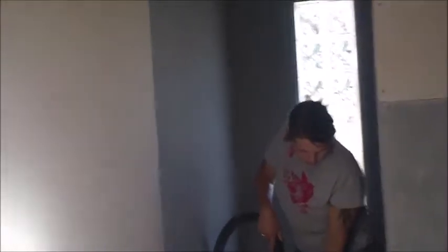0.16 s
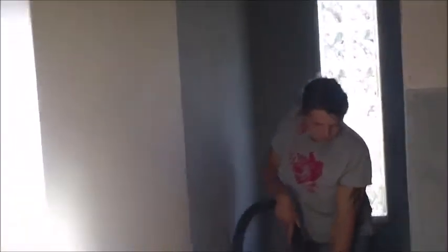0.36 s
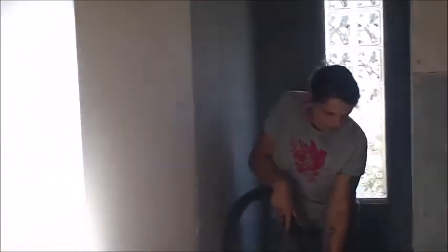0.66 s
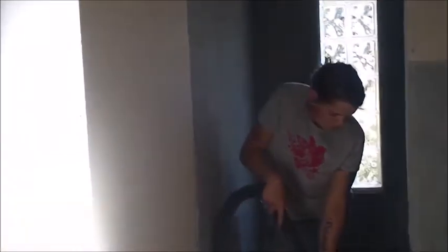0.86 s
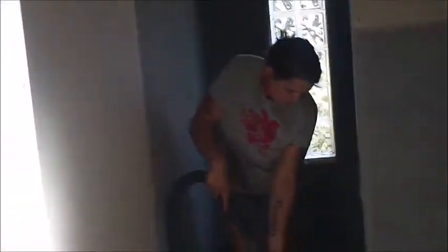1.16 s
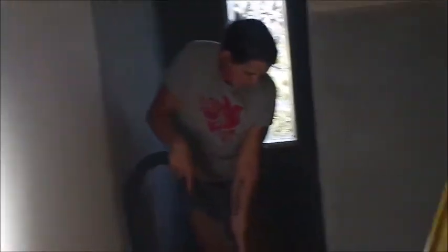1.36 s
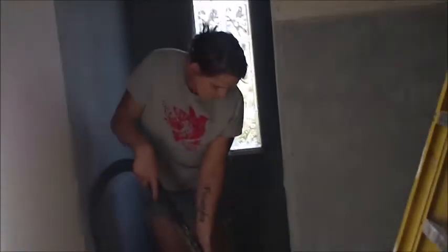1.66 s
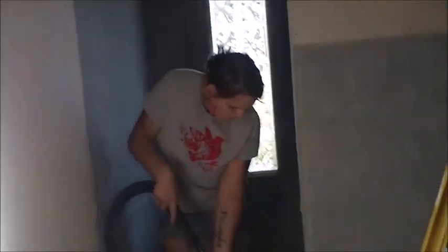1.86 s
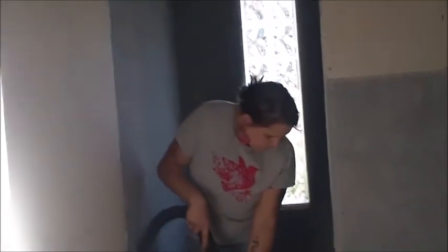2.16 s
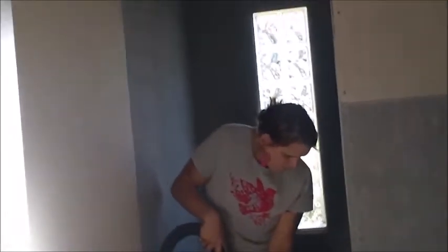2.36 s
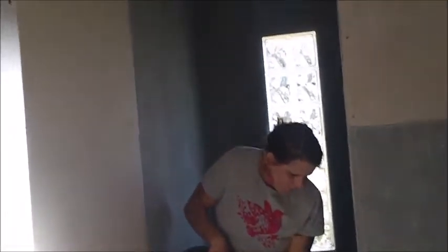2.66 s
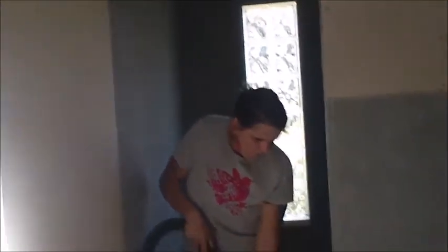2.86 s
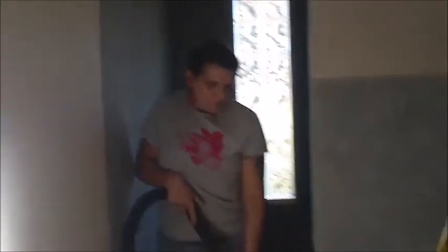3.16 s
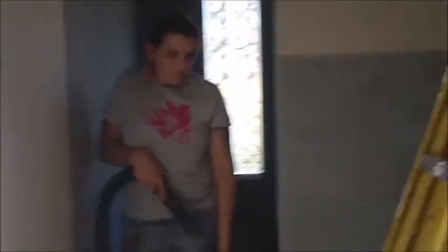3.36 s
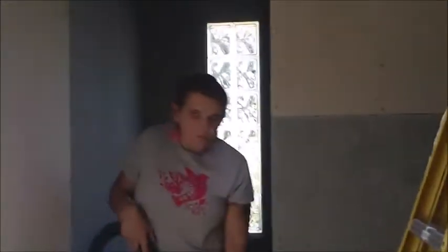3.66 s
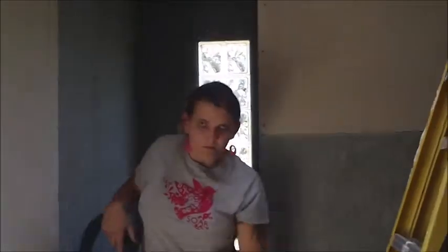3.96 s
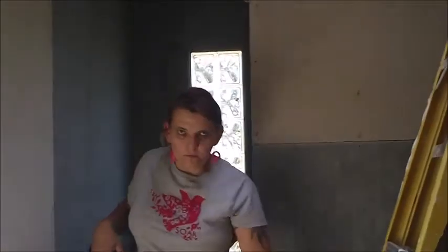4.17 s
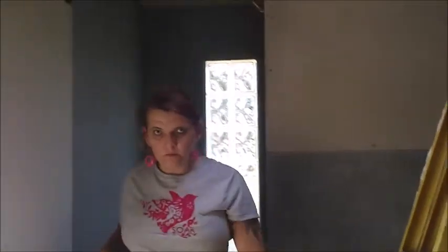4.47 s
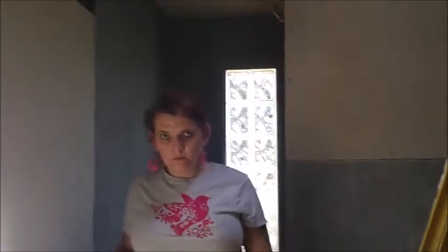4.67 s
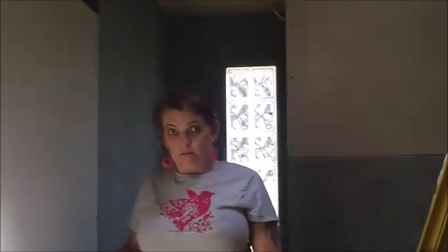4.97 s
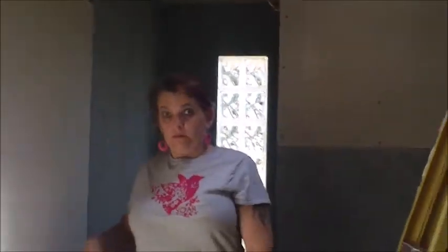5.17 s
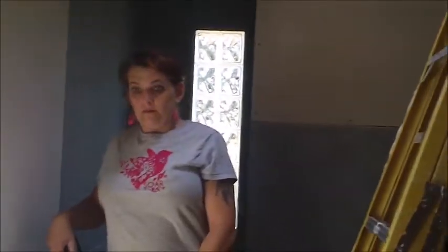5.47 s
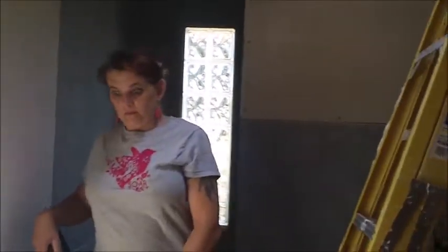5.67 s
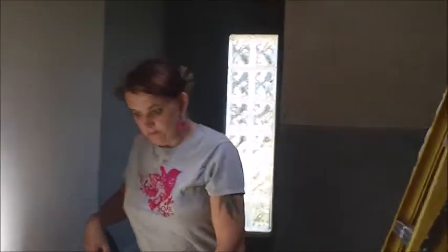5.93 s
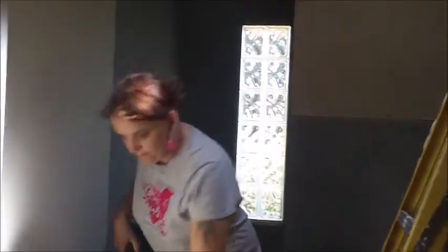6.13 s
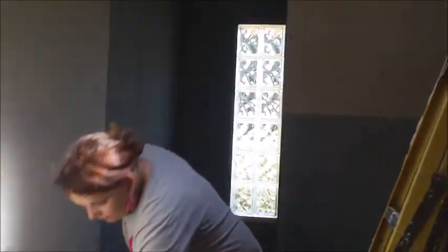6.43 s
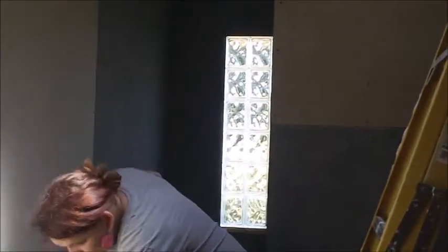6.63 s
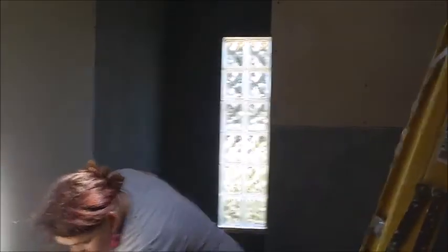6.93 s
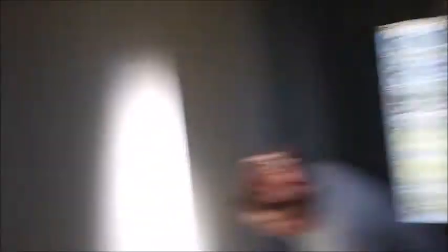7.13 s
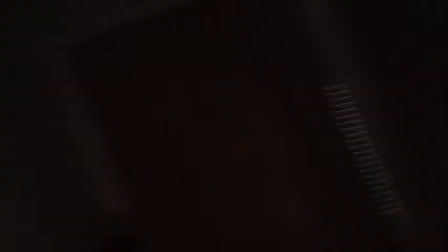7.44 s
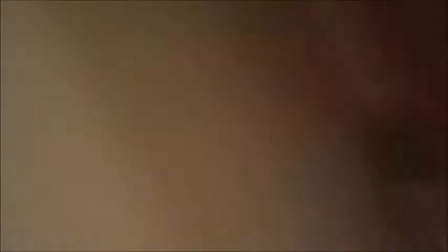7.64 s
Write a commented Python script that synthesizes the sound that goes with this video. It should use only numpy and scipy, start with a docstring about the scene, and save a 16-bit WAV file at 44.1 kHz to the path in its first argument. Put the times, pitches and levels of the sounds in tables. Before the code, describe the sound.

A vacuum cleaner runs close to a hand-held microphone in a bare room, its steady whine swelling and fading over rushing air and nozzle hiss. Midway comes a sharp tap, and the suction eases slightly. Near the end the cleaner is switched off and the motor starts winding down in a falling tone, with a brief soft rub and a second tap near the microphone.

```python
"""A vacuum cleaner's strong fan tone over rushing air, close to a hand-held microphone in a bare room.
Weak overtones flutter above it; air drones in the canister, rushes in the hose and hisses at the nozzle.
The suction eases as the nozzle comes to rest, and two taps and a rub sound close by. Switched off, the
motor coasts down, its falling tone swelling and fading through the plastered room's standing waves.
A limiter lifts the air noise whenever the tone is weak."""
import sys
import numpy as np
from scipy import signal
from scipy.fft import rfft, irfft, next_fast_len
from scipy.io import wavfile
from scipy.ndimage import uniform_filter1d, map_coordinates

SR = 44100
rng = np.random.default_rng(int(sys.argv[2]) if len(sys.argv) > 2 else 0)


def int16_out(signal):
    """Quantize to a 16-bit WAV file."""
    q = np.round(np.clip(np.atleast_2d(signal).T, -1, 1) * 32767)
    wavfile.write(sys.argv[1], SR, q.astype(np.int16))


N = 343980
T = np.arange(N) / SR

# hard taps near the microphone: start_s, level_db, pitch_hz, swell_s, echo_relative_db
TAPS = [(3.862, 3, 1700, .00022, -21), (7.6545, -1.5, 1230, .0006, -17)]
# spectra of the low rumble, hose rush, floor suction, nozzle hiss and fan rasp: frequency_hz, relative_db
RUMBLE_SPECTRUM = [(20, -17), (40, -20), (70, -5), (110, 3.5), (200, 2.5), (500, -24)]
HOSE_SPECTRUM = [(350, -31.5), (520, -3.5), (620, -5), (725, -2), (790, 0.5), (880, -2.5), (1010, -1),
                 (1130, -4), (1270, -2.5), (1400, -0.5), (1480, -4.5), (1570, -9.5), (1900, -36),
                 (3000, -65)]
SUCTION_SPECTRUM = [(900, -47), (1550, -7.5), (1750, -3.5), (1920, -3), (2200, -2.5), (2500, -5),
                    (2900, -7.5), (3400, -7.5), (4300, -15), (7000, -44)]
NOZZLE_SPECTRUM = [(2000, -36), (3300, -14), (4100, -3.5), (5200, -0.5), (6200, -2), (7100, 0), (9200, -3),
                   (10300, -5.5), (11600, -9), (13500, -12.5), (15200, -14)]
RASP_SPECTRUM = [(1200, -18), (1700, 7), (2200, -5), (2650, -9), (3300, -22)]
# whistles at the nozzle's lip: centre_s, half_length_s, pitch_hz, level_db
WHISTLES = [(2.2, 1.0, 5080, -34), (4.0, 0.38, 5950, -33), (4.8, 0.43, 6500, -31), (5.5, .3, 5750, -31),
            (6.35, .2, 5550, -32), (6.7, .3, 5870, -32), (7.7, .2, 5380, -39)]
# resonances of the canister, and of the hose and wand: pitch_hz, width_hz, relative_db
CANISTER_MODES = [(117, 18, -17), (170, 16, -7.5), (202, 24, -7), (240.3, 19.5, 2.5), (278.4, 13.2, 4.5),
                  (316, 8.8, -5), (356, 20, -1.5), (406, 26, -4), (469, 19, -2)]
PIPE_MODES = [(735, 31, -4.5), (773, 9.8, -1), (867, 26, -2.5), (952, 78, -11), (1403, 35, -2),
              (1668, 31, -2), (2020, 50, -27), (2740, 50, -3), (4596, 43, -3), (5670, 180, -14),
              (6070, 100, -2)]
# canister drone, shaft tone, its octave and blade tone at the moving microphone: time_s, relative_db
DRONE_CURVE = [(0, -2), (1.3, 0), (2.7, -0.5), (3.4, -1), (4.25, 3), (4.8, 1.5), (6.5, 0), (7.8, -2)]
SHAFT_CURVE = [(0, -5.5), (.3, -14), (.42, -26), (.6, -22), (.68, -32), (.78, -21), (.87, -10), (1.14, -4),
               (1.8, -4.5), (2.76, -11), (3.3, -10.5), (3.66, -5), (4.26, -10), (4.62, -4), (5.46, -1.8),
               (6.0, 1), (6.88, 1)]
OCTAVE_CURVE = [(0, -35), (1.7, -33.5), (2.15, -35), (3.5, -36), (4.2, -27.5), (4.5, -23.5), (4.75, -30.5),
                (5.6, -37), (6.88, -37)]
BLADE_CURVE = [(0, -43), (.48, -46), (.63, -33.5), (.8, -46), (1.17, -35.5), (1.5, -33), (1.95, -33),
               (2.28, -44.5), (2.7, -37), (3.1, -47), (4.38, -40.5), (5.3, -48), (5.52, -36), (5.82, -43),
               (6.06, -37), (6.36, -48), (6.88, -40)]
# weak fan overtones, one row for each of OVERTONE_ORDERS: full_suction_db, eased_change_db
OVERTONE_LEVELS = [(-29.5, -4), (-37.5, 1.5), (-36, -1), (-44, 0), (-48, 0)]
# the room's standing waves, crossed by the falling tone: pitch_hz, level_db
ROOM_MODES = [(473.9, 0), (458, -6.5), (439.0, -8), (423.7, -6), (412.5, -1.7), (399.6, -7), (379.3, -8),
              (367.3, -11.5), (355.5, -0.8), (344.4, -4.5), (331, -7.5), (318.4, -11), (313.5, -14),
              (300, -15.5), (288, -14.5), (276.9, -20), (269.5, -14.7), (261.3, -12), (254, -14.5),
              (246.7, -8.9)]
# resonances in which the falling overtones flare: pitch_hz, half_width_hz, level_db
FLARES = [(1160, 130, -27), (2120, 260, -30), (2640, 160, -31), (3250, 300, -38)]
# brief dips in the treble: centre_s, depth_db
TREBLE_DIPS = [(1.168, 16), (2.105, 16), (3.385, 10), (4.367, 14), (4.409, 14), (4.473, 10), (5.775, 15)]
# the recorder's treble notches: centre_hz, width_hz
NOTCHES = [(7890, 1520), (10980, 570)]

RUN_HZ, BLADES, OVERTONE_ORDERS = 496.8, 7, (3, 4, 5, 6, 14)
OFF_S, DRAG_S, FRICTION_HZ_PER_S = 6.89, 1.18, 39  # drag alone halves the speed in DRAG_S
EASE_FROM_S, EASE_TO_S = 2.26, 6.5
# air layers: full_suction_db, eased_change_db, loss_db_per_octave of slowing
RUMBLE_FLOW, DRONE_FLOW = (-45, -2.5, .5), (-23, -1.5, 8)
HOSE_FLOW, SUCTION_FLOW, NOZZLE_FLOW = (-16.5, -1.7, 7.8), (-23, -3, 3.2), (-19.5, -.69, 9.5)
BASS_FLOW, EDGE_FLOW = (2.5, -11.5, 3), (-.5, 1.8, 1)  # relative to the drone and to the hiss


def amp(db):
    """Decibels to gain."""
    return 10 ** (np.asarray(db) / 20)


def unit(x):
    """Scale to rms 1."""
    return x / np.sqrt(np.mean(x ** 2) + 1e-20)


def fader(curve, trim_db=0):
    """Gain per sample along a level curve."""
    return amp(np.interp(T, *np.transpose(curve)) + trim_db)


def bell(x, centre, half_width, db):
    """A bell-shaped gain along x with its top at db."""
    return amp(db) * np.exp(-((x - centre) / half_width) ** 2)


def wobble(rate):
    """A smooth random curve, rate knots a second."""
    return map_coordinates(rng.standard_normal(int(N * rate / SR) + 4), [T * rate], mode="nearest")


def resonance(f, hz, width):
    """Complex response of one mode, 1 at its centre."""
    return 1j * f * width / (hz * hz - f * f + 1j * f * width)


def filtered(x, response):
    """Pass x through a complex frequency response."""
    size = next_fast_len(N + SR // 2)
    return irfft(rfft(x, size) * response(np.fft.rfftfreq(size, 1 / SR)), size)[:N]


def rush(spectrum, patchy_db):
    """Turbulent noise of rms 1: a spectrum with drifting patches of gain."""
    bins = signal.stft(rng.standard_normal(N), nperseg=1024)[2]
    patches = uniform_filter1d(rng.standard_normal(bins.shape), size=6, axis=0)
    patches = uniform_filter1d(patches, size=16, axis=1)
    noise = signal.istft(bins * amp(patchy_db * unit(patches)), nperseg=1024)[1][:N]
    hz, db = np.transpose(spectrum)
    return unit(filtered(noise, lambda f: amp(np.interp(np.log(f + 1), np.log(hz), db))))


def partial(phase, scatter, rate):
    """A tone of rms 1: a steady part plus reflections that flutter at the given rate."""
    field = 1 + scatter * (wobble(rate) + 1j * wobble(rate))
    return unit(np.real(field * np.exp(1j * phase)))


def shaft_speed():
    """Turns per second: steady under power, then braked by air drag and friction."""
    coasted_s = np.maximum(T - OFF_S, 0)
    return RUN_HZ / (1 + coasted_s / DRAG_S) - FRICTION_HZ_PER_S * coasted_s


def flow(full_db, eased_db, loss_db):
    """Gain of a layer that follows the easing suction and the speed of the fan."""
    eased = np.clip((T - EASE_FROM_S) / (EASE_TO_S - EASE_FROM_S), 0, 1)
    return amp(full_db + eased_db * eased - loss_db * np.log2(RUN_HZ / shaft_speed()))


def room(x, t60, wet_db):
    """The direct sound plus the decaying answer of bare walls."""
    t = np.arange(SR // 2) / SR
    tail = rng.standard_normal(len(t)) * amp(-60 * t / t60) * (t > .003)
    echo = signal.fftconvolve(x, tail / np.linalg.norm(tail))[:N]
    wet = amp(wet_db)
    return (x + wet * echo) / np.sqrt(1 + wet ** 2)


def handling():
    """A short brushing rub and two hard, ringing taps near the microphone; the room answers the taps."""
    rub = rush([(5000, -25), (9500, 0), (13000, -7), (15000, -18)], patchy_db=1)
    out = bell(T, centre=7.4, half_width=.03, db=-27) * rub
    for start_s, db, hz, swell_s, echo_db in TAPS:
        t = np.maximum(T - start_s, 0)
        ring = t / swell_s * np.exp(1 - t / swell_s) * np.sin(2 * np.pi * hz * t)
        tap = filtered(ring, lambda f: resonance(f, hz, 2 * hz))
        echo = amp(echo_db - 60 * t / .12) * rush([(500, -30), (hz, 0), (5000, -35)], patchy_db=1)
        out += amp(db) * (T > start_s) * (tap + echo)
    return out


def whistles(width_hz=150):
    """Air at the nozzle's lip rings in a narrow band that shifts as the nozzle is moved."""
    band = lambda hz: unit(filtered(rng.standard_normal(N), lambda f: resonance(f, hz, width_hz) ** 2))
    return sum(bell(T, centre_s, half_s, db) * band(hz) for centre_s, half_s, hz, db in WHISTLES)


def canister():
    """Air drones in the canister's cavity; its lowest modes fade as the suction eases."""
    air = rush([(50, -14), (150, -.5), (430, -1), (800, -7)], patchy_db=1)
    cavity = lambda f: sum((-1) ** k * amp(db) * resonance(f, hz, width)
                           for k, (hz, width, db) in enumerate(CANISTER_MODES))
    drone = unit(filtered(air, cavity))
    bass = filtered(drone, lambda f: 1 / (1 + (f / 205) ** 12))
    return fader(DRONE_CURVE) * flow(*DRONE_FLOW) * (drone + (flow(*BASS_FLOW) - 1) * bass)


def piped_air(spectrum, patchy_db, t60, wet_db):
    """Turbulence coloured by the resonances of hose and wand, then by the room; rms 1."""
    pipe = lambda f: 1 + sum(amp(db) * resonance(f, hz, width) for hz, width, db in PIPE_MODES)
    air = filtered(rush(spectrum, patchy_db), pipe)
    return unit(room(air, t60, wet_db))


def airflow():
    """Air rushes in the hose, sucks at the floor and hisses at the nozzle, over a faint rumble."""
    hose = flow(*HOSE_FLOW) * piped_air(HOSE_SPECTRUM, patchy_db=.7, t60=.35, wet_db=-9)
    suction = flow(*SUCTION_FLOW) * piped_air(SUCTION_SPECTRUM, patchy_db=1, t60=.3, wet_db=-11)
    jet = piped_air(NOZZLE_SPECTRUM, patchy_db=1.3, t60=.2, wet_db=-13)
    fine_hiss = filtered(jet, lambda f: np.clip((f - 9500) / 3500, 0, 1))
    fine_loss = 1 - amp(-17 * np.maximum(T - OFF_S, 0) ** 2)  # a slower jet loses its finest hiss first
    bright_edge = filtered(jet, lambda f: bell(f, centre=6700, half_width=900, db=0))
    hiss = jet - fine_loss * fine_hiss + (flow(*EDGE_FLOW) - 1) * bright_edge
    rumble = flow(*RUMBLE_FLOW) * rush(RUMBLE_SPECTRUM, patchy_db=3)
    return hose + suction + flow(*NOZZLE_FLOW) * hiss + rumble


def coasting_fan(phase, speed):
    """Power off: the tone swells at each standing wave, the walls smear its overtones, the fan rasps."""
    standing_waves = sum(bell(speed, hz, .014 * hz, db) for hz, db in ROOM_MODES)
    tone = standing_waves * partial(phase, scatter=.12, rate=60)
    flare = lambda hz: sum(bell(hz, *row) for row in FLARES)
    whine = sum(flare(k * speed) * partial(k * phase, scatter=.6, rate=50) for k in (3, BLADES))
    rasp = bell(speed, centre=330, half_width=71, db=-30) * rush(RASP_SPECTRUM, patchy_db=3)
    return tone + room(whine, t60=.32, wet_db=3) + rasp


def running_fan(phase):
    """Under power: the shaft tone and its overtones, swelling as the microphone moves."""
    out = fader(SHAFT_CURVE) * partial(phase, scatter=.04, rate=24)
    out += fader(OCTAVE_CURVE, trim_db=4.5) * partial(2 * phase, scatter=.17, rate=12)
    out += fader(BLADE_CURVE, trim_db=6.5) * partial(BLADES * phase, scatter=.24, rate=14)
    for order, (db, eased_db) in zip(OVERTONE_ORDERS, OVERTONE_LEVELS):
        out += flow(db, eased_db, loss_db=0) * partial(order * phase, scatter=.5, rate=12)
    return out


def motor():
    """One rotation drives all the fan's tones; running gives way to coasting at switch-off."""
    speed = shaft_speed()
    phase = 2 * np.pi * np.cumsum(speed) / SR + .14 * wobble(2.48)
    off = np.clip((T - OFF_S) / .029, 0, 1)
    return (1 - off) * running_fan(phase) + off * coasting_fan(phase, speed)


def scene():
    """The cleaner at close range, the same in both channels; the treble dips now and then."""
    sound = motor() + canister() + airflow() + whistles() + handling()
    treble = filtered(sound, lambda f: 1 - 1 / (1 + (f / 3000) ** 4))
    dip_db = sum(depth_db * bell(T, centre_s, half_width=.007, db=0) for centre_s, depth_db in TREBLE_DIPS)
    sound -= (1 - amp(-dip_db)) * treble
    return np.array([sound, sound])


def limiter(x, start_db=-6, ceiling_db=-3, attack_s=.002, release_db_per_s=12.5):
    """The gain ducks quickly under every peak above the ceiling and creeps back up."""
    needed_db = np.minimum(ceiling_db - 20 * np.log10(np.abs(x) + 1e-9), 0)
    recovery_db = release_db_per_s * T
    gain_db = np.minimum.accumulate(np.minimum(needed_db - recovery_db, start_db)) + recovery_db
    pole = np.exp(-1 / (attack_s * SR))
    return x * amp(start_db + signal.lfilter([1 - pole], [1, -pole], gain_db - start_db))


def record(dry):
    """The hand-held recorder limits the level, cuts two treble notches and drops the very top."""
    top_hz = 15330
    notches = lambda f: np.prod([np.abs(1 - resonance(f, hz, width)) for hz, width in NOTCHES], axis=0)
    return np.array([filtered(limiter(channel), lambda f: notches(f) * (f < top_hz)) for channel in dry])


dry = scene()
out = record(dry)
int16_out(out)
```